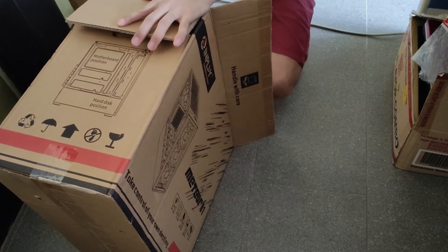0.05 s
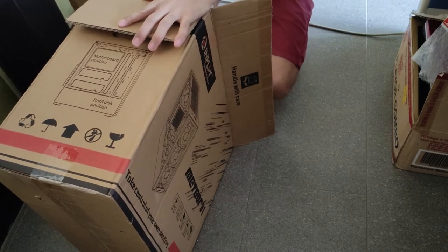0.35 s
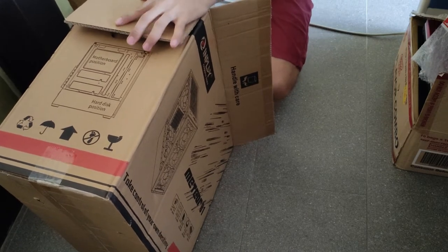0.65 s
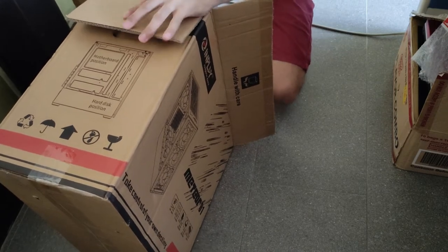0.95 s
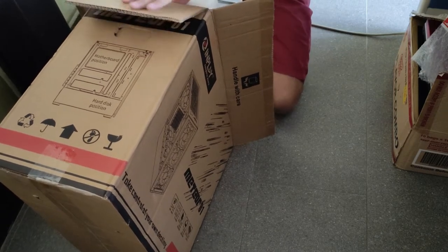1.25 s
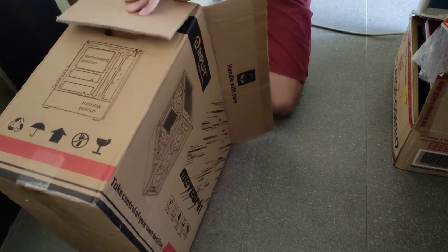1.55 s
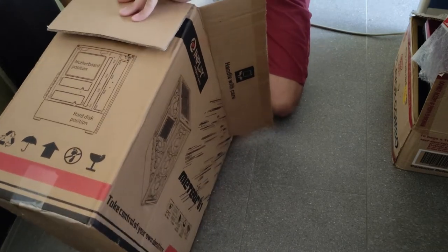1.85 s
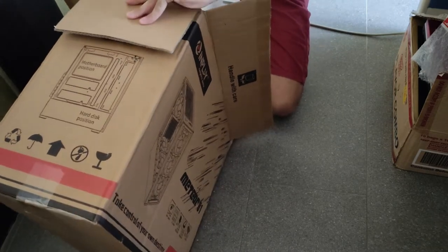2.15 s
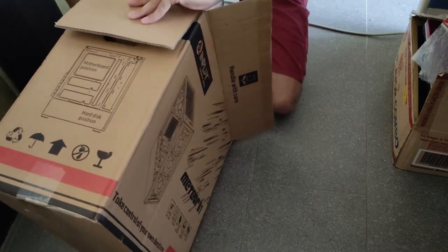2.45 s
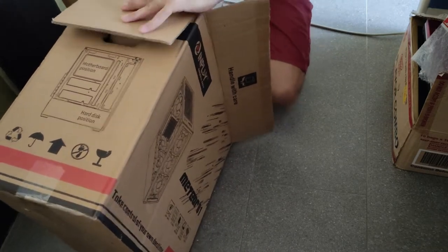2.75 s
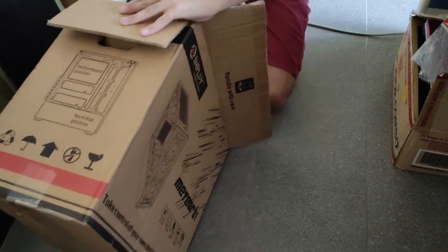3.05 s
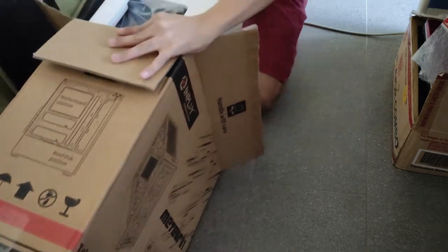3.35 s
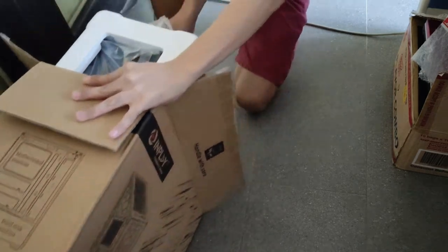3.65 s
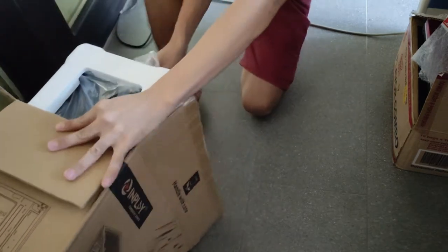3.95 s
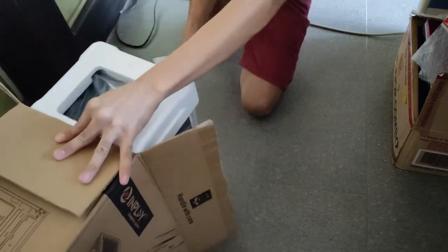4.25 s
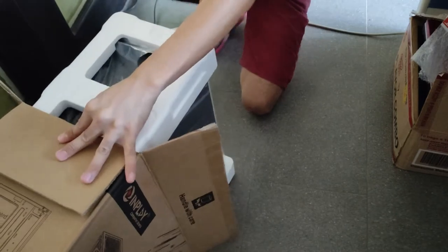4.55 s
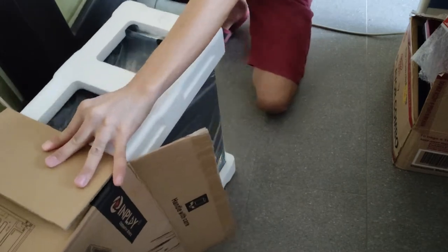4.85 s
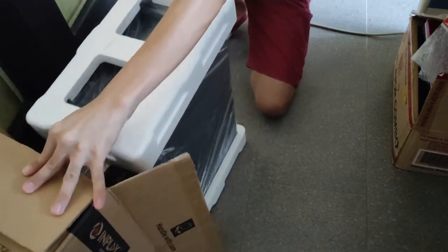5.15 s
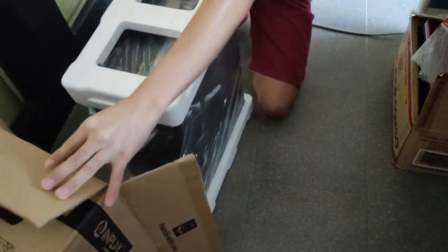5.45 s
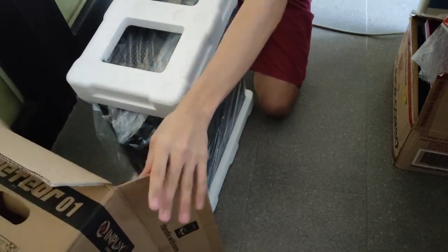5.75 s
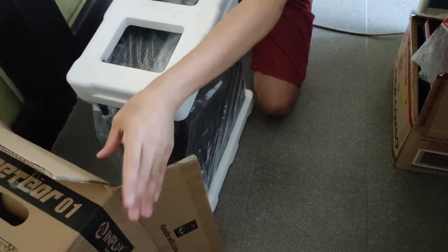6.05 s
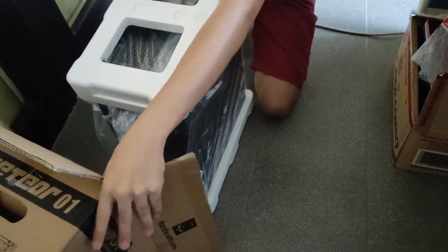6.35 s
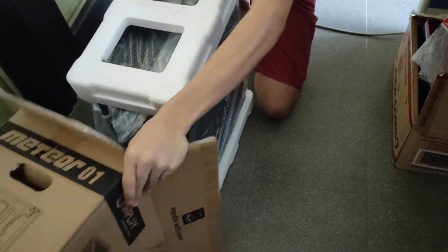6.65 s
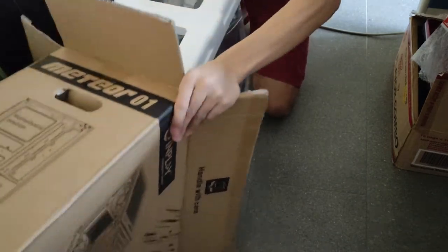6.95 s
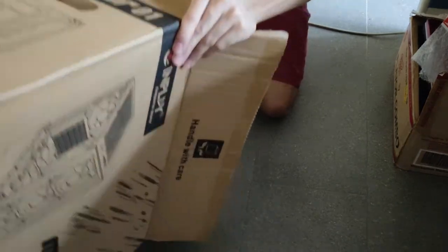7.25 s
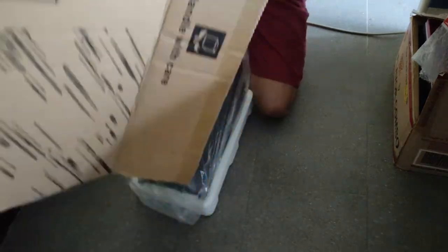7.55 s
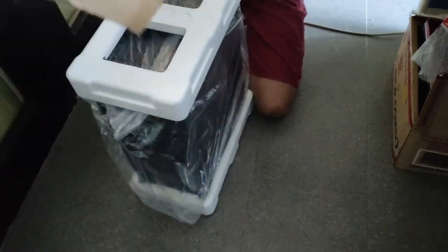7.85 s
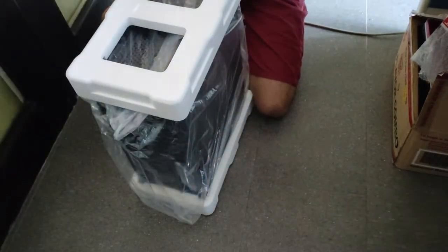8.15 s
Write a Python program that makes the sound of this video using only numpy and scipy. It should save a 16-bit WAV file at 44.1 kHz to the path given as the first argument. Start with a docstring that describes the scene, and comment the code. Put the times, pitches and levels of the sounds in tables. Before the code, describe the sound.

Cardboard rubs and bumps lightly, then a flap snaps free and claps against the box. Foam packing grates along the board and a plastic bag swishes as a computer case slides out and thumps on a hard floor. A second scrape with hollow knocks follows, then softer rustles, crisp plastic pops and light knocks as the empty box is set down, all echoing in a small bare room.

```python
"""Grating, swishing and hollow bumps, then a thump: a computer case is pulled out of its cardboard box.
Its foam end caps catch and slip along the board, whose panels drum, and its plastic bag swishes.
A flap snaps free, and the case slides out and drops on the hard floor, crushing the foam.
The empty box is bumped, lifted away and set down.
A small bare room echoes it all, heard through two microphone ports (small openings that ring)."""
import sys
import numpy as np
from scipy import signal
from scipy.fft import rfft, irfft, next_fast_len
from scipy.io import wavfile
from scipy.ndimage import uniform_filter1d, map_coordinates

SR = 44100
rng = np.random.default_rng(int(sys.argv[2]) if len(sys.argv) > 2 else 0)


def unload_wav(signal):
    """Save mono or channel-first audio to the path in sys.argv[1] as 16-bit WAV at rate SR, clipped to [-1, 1]."""
    wavfile.write(
        sys.argv[1],
        SR,
        np.round(np.clip(np.atleast_2d(signal).T, -1, 1) * 32767).astype(np.int16),
    )


N = 370881

# tone colour of the plastic bag: f/Hz, level/dB
BAG_COLOUR = [(800, -17), (2200, -5), (4500, -1), (6700, 5.5), (9000, -0.5), (12000, 0.5), (15500, 1)]
# the two long slides, out of the box and clear of it; for each: t/s, grating/dB, swish/dB
LONG_SLIDES = [
    [(3.0, -51.5, -57), (3.156, -50.5, -38.5), (3.188, -42.5, -42), (3.23, -45, -39), (3.44, -37.5, -35.5),
     (3.72, -34.5, -35), (3.86, -41, -36.5), (3.98, -40, -37), (4.102, -42.5, -49), (4.204, -60, -62),
     (4.25, -52, -54)],
    [(4.77, -47, -55), (4.79, -40.5, -61), (4.812, -42, -36.5), (4.894, -47, -34.5), (4.924, -41.5, -34),
     (5.054, -42.5, -36), (5.21, -42, -39), (5.3, -49, -42.5), (5.394, -49.5, -41), (5.566, -52, -40.5),
     (5.7, -57, -56)],
]


def amp(db):
    """Turn decibels into a gain to multiply by."""
    return 10 ** (np.asarray(db) / 20)


def unit(x):
    """Scale a signal so that its average strength (rms) is 1."""
    return x / np.sqrt(np.mean(x ** 2) + 1e-20)


def along(points, hz):
    """Read between (f/Hz, value) points, with every octave equally wide."""
    freqs, values = np.transpose(points)
    return np.interp(np.log(hz + 1), np.log(freqs), values)


def curves(rows):
    """Join timed rows with straight lines: one curve for each column after the time."""
    times, *columns = np.transpose(rows)
    return [np.interp(np.arange(N) / SR, times, column) for column in columns]


def wobble(rate):
    """A smooth curve through `rate` random values a second."""
    values = rng.standard_normal(int(N * rate / SR) + 4)
    return map_coordinates(values, [np.arange(N) * rate / SR])


def filtered(x, response):
    """Multiply each frequency in x by response(frequency)."""
    n = x.shape[-1]
    padded = next_fast_len(n + SR // 2)
    return irfft(rfft(x, padded) * response(np.fft.rfftfreq(padded, 1 / SR)), padded)[..., :n]


def coloured(x, spectrum):
    """Give x a tone colour drawn as (f/Hz, level/dB) points."""
    return filtered(x, lambda hz: amp(along(spectrum, hz)))


def resonances(hz, modes, strengths):
    """Response of an object's modes, the notes it rings at; neighbours swing in opposite directions."""
    return sum((-1) ** k * strength * amp(db) * 1j * hz * width / (note ** 2 - hz ** 2 + 1j * hz * width)
               for k, (strength, (note, width, db)) in enumerate(zip(strengths, modes)))


def diffuse(pair):
    """Sound from all around: two unrelated signals become alike in the bass, but not in the treble."""
    # how alike left and right are: f/Hz, likeness (1 = the same)
    likeness = [(60, 0.95), (290, 0.91), (640, 0.28), (1400, 0), (15000, 0)]
    angle = lambda hz: np.arccos(np.clip(along(likeness, hz), -1, 1)) / 2
    mid, side = filtered(pair, lambda hz: np.array([np.cos(angle(hz)), np.sin(angle(hz))]))
    return np.array([mid + side, mid - side])


def room(wet_db, onset_s=0.001):
    """The room's answer to a click: the direct sound, then an echo (at wet_db) whose bass lasts longest."""
    # time the echo takes to fade by 60 dB: f/Hz, t/s
    fade_times = [(80, 0.75), (250, 0.56), (500, 0.6), (800, 0.54), (3000, 0.42), (12000, 0.23)]
    hz, t, noise = signal.stft(rng.standard_normal((2, SR * 3 // 4)), SR, nperseg=256)
    tail = signal.istft(noise * amp(-60 * t / along(fade_times, hz)[:, None]), SR, nperseg=256)[1]
    build_up = 1 - np.exp(-(np.arange(tail.shape[1]) / SR / onset_s) ** 2)
    tail = diffuse(tail) * build_up
    response = amp(wet_db) * tail / np.linalg.norm(tail[0])
    response[:, 0] += 1  # the direct sound
    return response


def in_room(x, wet_db):
    """Add the room's echo to a sound."""
    return signal.oaconvolve(x, room(wet_db), axes=1)[:, :N]


def friction(spectrum, slip_rate, spread_db, wet_db):
    """Rubbing is many tiny slips of uneven size (slip_rate a second), coloured by the surface."""
    slips = (rng.random(N) < slip_rate / SR) * rng.choice([-1, 1], N)
    slips = slips * amp(spread_db * np.clip(rng.standard_normal(N), -2, 2))
    # the contact wanders between four places, each with its own echoes
    places = np.array([wobble(5) for _ in range(4)])
    places = places / np.linalg.norm(places, axis=0)
    heard = sum(in_room((slips * share)[None], wet_db) for share in places)
    return unit(coloured(heard, spectrum))


def blows(rows, modes, wet_db, crush):
    """Each hit rings the modes and the room; a longer contact is duller, and crushing roughens its push."""
    out = np.zeros((2, N + SR))
    t = np.arange(SR // 2) / SR
    length = round(.7 * SR)
    for start, db, contact_ms in rows:
        push = np.exp(-1000 * t / contact_ms) + crush * np.exp(-t / 0.016) * rng.standard_normal(len(t))
        strengths = amp(rng.standard_normal(len(modes)))
        ring = filtered(push, lambda hz: resonances(hz, modes, strengths))
        hit = in_room(ring[None] / np.abs(ring).max(), wet_db)[:, :length]
        out[:, round(start * SR):][:, :length] += amp(db) * hit
    return out[:, :N]


def bursts(rows):
    """The power of sounds that start at once and die away."""
    t = np.arange(SR // 4) / SR
    power = np.zeros(N + SR)
    for start, db, fade_ms in rows:
        power[round(start * SR):][:len(t)] += (amp(db) * np.exp(-1000 * t / fade_ms)) ** 2
    return power[:N]


def rustle(power, spectrum, wet_db):
    """Coloured noise that follows a power curve, in the room; very short bursts sound like pops."""
    noise = np.sqrt(power) * rng.standard_normal((2, N))
    return coloured(in_room(noise, wet_db), spectrum)


def speed(start, rise, fall):
    """A stroke speeds up to 1 and slows to rest, each along a quarter of a sine wave."""
    phase = np.interp(np.arange(N) / SR, [start, start + rise, start + rise + fall], [0, 1, 0])
    return np.sin(np.pi / 2 * phase)


def room_air():
    """The low rush of the room, its level wavering slightly."""
    # tone colour of the rush: f/Hz, level/dB
    air_colour = [(25, 10), (45, -2), (75, -1), (150, 1), (280, 3.5), (360, -3.5), (700, -5), (1000, -12),
                  (1700, -12.5), (2000, -21.5), (5000, -37), (15000, -28)]
    air = unit(coloured(diffuse(rng.standard_normal((2, N))), air_colour))
    return amp(-47.5 + 0.7 * wobble(2.45)) * air


def rubbing_levels():
    """How loud the grating and swish are, in dB: light handling, two long slides and short strokes."""
    # light rubbing all along, weaker once the case is out: t/s, grating/dB, swish/dB
    handling = [(0, -51, -50.5), (.53, -53, -54.5), (1.1, -54, -59), (1.45, -58, -55.5), (2.1, -51, -54.5),
                (2.7, -54.5, -56), (4.25, -49.5, -49), (4.7, -49, -55), (5.3, -51.5, -48),
                (5.8, -64.5, -59.5), (6.15, -62.5, -71), (6.9, -60, -67), (8, -66, -74)]
    # foam, bag and flaps brush the board: start/s, speeding up/s, slowing down/s, grating/dB, swish/dB
    strokes = [(.02, 0.078, 0.082, -51.5, -45.5), (.18, 0.033, .26, -66, -46.5),
               (.575, 0.018, 0.25, -54, -51), (.745, 0.037, 0.13, -48, -44.5),
               (.82, 0.052, 0.057, -45, -52), (.9, 0.057, 0.091, -53, -63), (1.27, 0.024, 0.1, -64, -48.5),
               (1.55, 0.045, 0.27, -57, -50.5), (1.71, 0.053, 0.041, -53, -63),
               (1.9, 0.034, 0.037, -50.5, -50.5), (2.134, 0.01, 0.13, -44, -47),
               (2.15, 0.17, 0.21, -44, -36.5), (2.73, 0.15, 0.09, -49.5, -51),
               (4.27, 0.15, 0.22, -51.5, -36), (5.68, 0.24, 0.18, -61, -60.5),
               (6.21, 0.037, 0.1, -54, -51.5), (6.39, 0.045, 0.15, -61, -56.5),
               (6.79, 0.11, 0.17, -67, -57), (6.909, 0.031, 0.06, -48, -45),
               (6.99, 0.03, 0.051, -57, -43.5), (7.06, 0.031, 0.22, -65, -55.5),
               (7.41, 0.03, 0.15, -57.5, -52.5), (7.5, 0.19, .17, -54, -53), (7.725, 0.021, 0.1, -66, -48),
               (8.025, 0.035, 0.029, -77, -53.5), (8.143, 0.0064, 0.032, -67, -45.5),
               (8.22, .015, 0.064, -64, -54.5), (8.33, 0.0092, 0.088, -76, -53)]
    slide_gains = amp([[-0.5], [-1]])  # grating, swish
    t = np.arange(N) / SR
    power = amp(curves(handling)) ** 2
    for slide in LONG_SLIDES:
        moving = (t >= slide[0][0]) & (t <= slide[-1][0])
        power += moving * (amp(curves(slide)) * slide_gains) ** 2
    for start, rise, fall, grate_db, swish_db in strokes:
        pace = speed(start, rise, fall)
        power[0] += (amp(grate_db) * pace ** 0.74) ** 2  # faster is louder, the grating most of all
        power[1] += (amp(swish_db) * pace ** 0.42) ** 2
    settle_s = .016  # the rubbing takes a moment to die away
    carry = np.exp(-1 / (settle_s * SR))
    settled = signal.lfilter([1 - carry], [1, -carry], power, zi=carry * power[:, :1])[0]
    return 10 * np.log10(settled)


def shifting_folds(x, patchy_db):
    """The tone colour shifts from moment to moment as new folds of the bag touch the board."""
    spectra = signal.stft(x, nperseg=512)[2]
    patches = uniform_filter1d(rng.standard_normal(spectra.shape[1:]), size=5, axis=0)  # blur in pitch
    patches = uniform_filter1d(patches, size=9, axis=1)  # blur in time
    return unit(signal.istft(spectra * amp(patchy_db * unit(patches)), nperseg=512)[1][:, :N])


def catches(rate, decay_s):
    """The foam snags at random moments and lets go: jumps that sag away, centred on 0."""
    snags = (rng.random(N) < rate / SR) * rng.uniform(0.25, 1, N)
    sagging = signal.lfilter([1], [1, -np.exp(-1 / (decay_s * SR))], snags)
    return sagging - sagging.mean()


def sliding(grate_db, swish_db):
    """Foam catches and slips along the board; one uneven grip moves the grating, swish and drumming."""
    # tone colours of the grating foam and the drumming panels: f/Hz, level/dB
    grate_colour = [(100, -36), (170, -27), (250, -2.5), (480, 5.5), (900, 3), (1600, 4), (1950, 0),
                    (4000, -1), (6700, -0.5), (9000, -7.5), (15000, -19)]
    panel_colour = [(50, -10), (90, -7.5), (150, -5.5), (220, -1), (295, -0.5), (345, -3), (420, -2.5),
                    (520, -15), (700, -5.5), (1500, -18), (4000, -36)]
    # the last foam cap judders out: start/s, speeding up/s, slowing down/s
    judder = (4.87, 0.25, 0.18)
    grip_db = .5 * wobble(60) + .5 * wobble(16)
    grate = amp(grate_db + 5) * friction(grate_colour, slip_rate=2500, spread_db=4.5, wet_db=8)
    bag = shifting_folds(friction(BAG_COLOUR, slip_rate=5000, spread_db=8.5, wet_db=6), patchy_db=1.6)
    swish = amp(swish_db + 1.5 + 0.94 * catches(rate=11, decay_s=0.021)) * bag
    drum_db = -43 + 0.41 * (grate_db + 33.5)  # harder grating shakes the panels more
    shaking = np.hypot(amp(drum_db), amp(-37.5) * speed(*judder))
    drum = shaking * friction(panel_colour, slip_rate=600, spread_db=3.5, wet_db=1.5)
    return amp(grip_db) * (grate + swish + drum)


def crinkles_and_scuffs(swish_db, crinkle_rate):
    """The sliding bag makes tiny crinkles; now and then a surface lets go and rustles to rest."""
    # brief scuffs of foam and flaps: t/s, level/dB, fade time/ms
    scuffs = [(1.495, -46, 12), (2.478, -34.5, 37), (3.18, -44, 23), (4.539, -33.5, 18), (4.81, -39.5, 20),
              (5.07, -47, 17)]
    # tone colour of both: f/Hz, level/dB
    crinkle_colour = [(300, -12), (1200, 14.5), (4500, 2), (8000, 3), (15000, -10.5)]
    t = np.arange(SR // 4) / SR
    folds = (rng.random(N) < crinkle_rate / SR) * amp(swish_db + rng.uniform(-16.5, 5.7, N))
    crinkle_power = np.abs(signal.fftconvolve(folds ** 2, np.exp(-t / 0.00043))[:N])
    return rustle(bursts(scuffs) + crinkle_power, crinkle_colour, wet_db=-3.5)


def box_bumps():
    """Each bump rings a cardboard panel and the air inside the box."""
    # bumps against the box: t/s, panel level/dB, air level/dB, contact time/ms
    bumps = [(.118, -36.5, -58, 1.5), (.322, -35, -51, 1.1), (.884, -41, -54, 1.2), (.952, -37, -58, 0.37),
             (.99, -38, -56, 0.54), (2.148, -34, -55, 1.8), (2.232, -28.5, -46, 0.38),
             (2.332, -36, -32.5, .87), (2.483, -31.5, -34.5, 0.8), (2.888, -31.5, -42, 0.78),
             (2.908, -31, -42, 1.3), (3.182, -32, -53, 0.7), (3.974, -26.5, -52, 0.92),
             (4.493, -32, -34, 1.5), (4.996, -27.5, -36, 1.7), (5.095, -25, -34.5, 0.55),
             (5.114, -25, -38, 0.63), (5.183, -30, -39, 0.6), (5.205, -28.5, -38, 0.21),
             (5.236, -31.5, -47, 1.2), (5.361, -40, -57, 0.61), (5.558, -35, -50, 0.8),
             (6.236, -31, -45, 1.2), (6.436, -33, -37.5, 1.6), (6.479, -39, -46, 1),
             (6.938, -28.5, -31.5, 1.3), (6.957, -30.5, -38, 1.3), (7.752, -38, -42.5, 1.56),
             (8.228, -36.5, -37, .6)]
    # notes of the panel and of the air inside: f/Hz, width/Hz, level/dB
    panel_modes = [(144.4, 42, -0.5), (233, 51, 5), (309, 73, -3.5), (415, 155, -1.5), (550, 70, 1.5),
                   (900, 500, -28)]
    air_modes = [(78, 24, 1), (128, 25, 8.6), (160, 24, 4.9), (206, 26, 2.2)]
    panel = blows([(s, db, ms) for s, db, _, ms in bumps], panel_modes, wet_db=-2, crush=0.39)
    boom = blows([(s, db, ms) for s, _, db, ms in bumps], air_modes, wet_db=-6.5, crush=.03)
    return panel + boom


def flap_taps():
    """Stiff flap edges tap and snap; the short contacts make a bright sound."""
    # taps and snaps: t/s, level/dB, contact time/ms
    taps = [(.886, -34, 0.069), (1.782, -37, .25), (1.985, -37, 0.14), (2.15, -33.5, 0.17),
            (2.306, -27, 0.057), (2.33, -12.5, 0.24), (2.3345, -15, 0.18), (5.09, -32, 0.7),
            (6.274, -34.5, 0.52)]
    # notes of the flap: f/Hz, width/Hz, level/dB
    flap_modes = [(420, 80, -4.5), (567, 39, -1), (764, 68, 4.5), (798, 60, 4), (848, 70, 3.5),
                  (1060, 140, -4), (1220, 84, -1), (1550, 160, -11)]
    return blows(taps, flap_modes, wet_db=-4, crush=0.04)


def bag_crackle():
    """Each tug at the bag sets off a shower of crisp creases, far fewer than in the swish."""
    # the bag is pulled tight: start/s, tightening/s, slackening/s, level/dB
    tugs = [(2.28, .07, .19, -35.5), (4.805, .025, .1, -35.5), (5.04, .04, .07, -37),
            (5.49, .06, .04, -34.5), (6.99, .035, .05, -42), (7.43, .04, .08, -53)]
    pull = sum(amp(db) * speed(start, rise, fall) for start, rise, fall, db in tugs)
    return pull * friction(BAG_COLOUR, slip_rate=1100, spread_db=4.5, wet_db=0)


def flap_claps():
    """The freed flap claps back against the wall of the box and makes it ring."""
    # claps: t/s, level/dB, contact time/ms
    claps = [(2.478, -20.5, 0.099), (2.4825, -20, 0.31), (2.496, -28, 0.16)]
    # notes of the wall: f/Hz, width/Hz, level/dB
    wall_modes = [(151, 73, -4.5), (260, 70, -3), (424, 104, -2), (586.4, 50, 7.5), (780, 160, 0),
                  (1180, 100, 7), (1280, 79, 2), (2000, 640, -21)]
    return blows(claps, wall_modes, wet_db=-4, crush=0.04)


def hollow_box():
    """The first long slide sounds the hollow behind the case; as the hollow lengthens, its notes sink."""
    # notes of the air in the box as the slide begins: f/Hz, width/Hz, level/dB
    hollow_modes = [(247, 22, -1.5), (409, 49, -4.5), (550, 81, -1.5), (826, 170, -11)]
    sink_octaves_per_s = 0.13
    slide = LONG_SLIDES[0]
    start, end = slide[0][0], slide[-1][0]
    t = np.arange(N) / SR
    rub = friction([(20, 0), (20000, 0)], slip_rate=900, spread_db=2, wet_db=-1.5)
    ring = unit(filtered(rub, lambda hz: resonances(hz, hollow_modes, np.ones(len(hollow_modes)))))
    # reading the ring more and more slowly lowers its pitch
    clock = np.cumsum(2 ** (-sink_octaves_per_s * np.clip(t - start, 0, end - start)))
    sinking = np.array([np.interp(clock, np.arange(N), side) for side in ring])
    fade = np.interp(t, [start, start + .1, end - .1, end], [0, 1, 1, 0])
    grate_db = curves(slide)[0]
    level_db = -38.5 + 0.7 * (grate_db - grate_db.max())  # swells with the grating
    return fade * amp(level_db) * sinking


def crease_pops():
    """Single creases of the bag snap over with a crisp pop."""
    # pops: t/s, level/dB, fade time/ms
    pops = [(4.081, -31, 2), (5.805, -46, 3), (6.012, -39, 4), (6.048, -43, 20), (6.472, -45, 3),
            (7.734, -40, 4), (7.962, -53, 3), (8.159, -44, 9), (8.223, -34, 2.5)]
    # tone colour of a pop: f/Hz, level/dB
    pop_colour = [(500, -25), (2000, -6), (4500, -3), (9000, -0.5), (15000, -9)]
    return rustle(bursts(pops), pop_colour, wet_db=-2)


def landing():
    """The foam caps take the weight with a dead thud and a crunch; the steel case inside rings on."""
    # the case lands on one cap, then rocks flat: t/s, relative level/dB, contact time/ms
    drop = [(4.5365, -13, 0.45), (4.5435, -16, 0.5), (4.548, -11.5, 0.5), (4.5645, -14.5, 0.75)]
    # notes of a foam cap and of the case: f/Hz, width/Hz, level/dB
    cap_modes = [(99, 42, 4), (236, 91, 2.5), (800, 280, -24)]
    case_modes = [(86.4, 15.8, -8), (111, 13, 2), (145, 24, 2.5), (204, 27, 0), (256, 35, 1.5),
                  (313, 18, 5.5), (370, 13, -1), (407, 13, 3), (498, 19, -1), (570, 14, 0.5),
                  (760, 42, -1.5), (883, 43, -3.5), (1260, 550, -14), (2300, 610, -24)]
    # the foam cracks as it is crushed: t/s, relative level/dB, fade time/ms
    cracks = [(4.537, -26, 7), (4.551, -24, 6)]
    # tone colour of the cracks: f/Hz, level/dB
    crunch_colour = [(300, -15), (900, 8.5), (1400, -1), (2500, -5), (3200, -11), (4500, -18), (9000, -35)]
    thud = amp(-0.5) * blows(drop, cap_modes, wet_db=-14, crush=.02)
    crunch = amp(10.5) * rustle(bursts(cracks), crunch_colour, wet_db=-3)
    ring = blows(drop, case_modes, wet_db=-2.5, crush=0.085)
    return thud + crunch + ring


def box_set_down():
    """The empty box is set down with a few light, hollow knocks."""
    # knocks: t/s, level/dB, contact time/ms
    knocks = [(8.161, -29, 0.3), (8.224, -25.5, 0.06), (8.246, -44, 1.8), (8.327, -32.5, 0.35)]
    # notes of the empty box: f/Hz, width/Hz, level/dB
    empty_modes = [(136, 17, 3.5), (288, 44, -5), (437, 89, 3), (563, 86, 3), (726, 78, -5),
                   (1200, 360, -12), (1690, 110, -9)]
    return blows(knocks, empty_modes, wet_db=-3, crush=.02)


def scene():
    """Add up the rubbing, the bag, the knocks and the room's own rush."""
    grate_db, swish_db = rubbing_levels()
    rubbing = sliding(grate_db, swish_db) + crinkles_and_scuffs(swish_db, crinkle_rate=39) + hollow_box()
    bag = bag_crackle() + crease_pops()
    knocks = landing() + flap_taps() + flap_claps() + box_set_down()
    return rubbing + bag + knocks + room_air() + box_bumps()


def record(dry):
    """Each microphone port rings at its own treble pitch; deep bass and the very top are lost."""
    # treble peaks and dips of the two ports: f/Hz, level/dB
    left_port = [(1500, 0.5), (4000, 1), (6700, -4.5), (7050, -9), (8800, -1), (9800, -1.5), (10500, 2.5),
                 (11800, 14.5), (12900, 5), (15000, -0.5)]
    right_port = [(1500, 1), (4000, 1.5), (6700, -1.5), (7050, -5), (7900, 0), (8850, 12.5), (10200, 4),
                  (11000, -16), (11400, -17), (11750, -1.5), (13000, 3), (15000, -13)]
    low_hz, top_hz = 62, 15750
    ported = np.array([coloured(dry[0], left_port), coloured(dry[1], right_port)])
    thinned = signal.sosfilt(signal.butter(3, low_hz, "high", fs=SR, output="sos"), ported)
    return filtered(thinned, lambda hz: hz < top_hz)


dry = scene()
out = record(dry)
unload_wav(out)
```